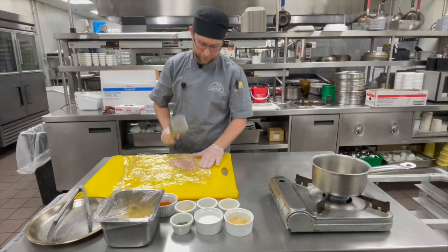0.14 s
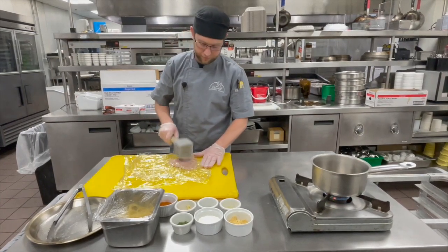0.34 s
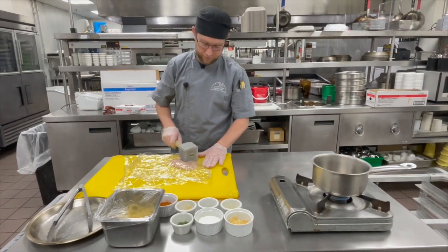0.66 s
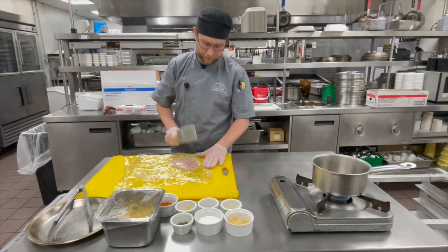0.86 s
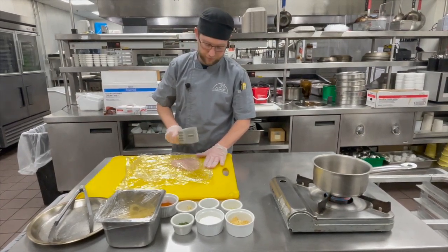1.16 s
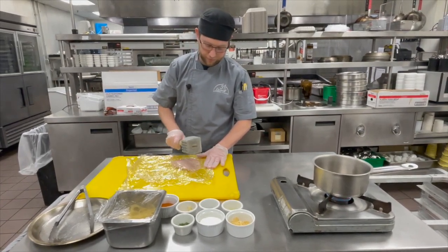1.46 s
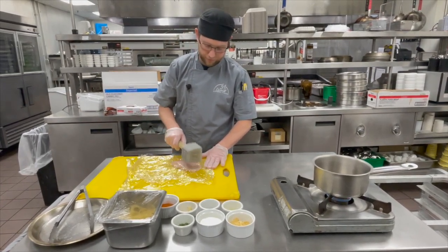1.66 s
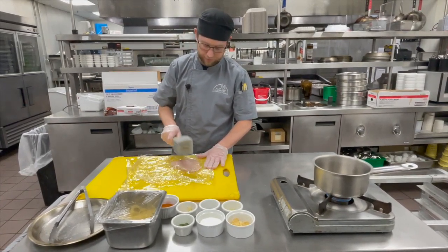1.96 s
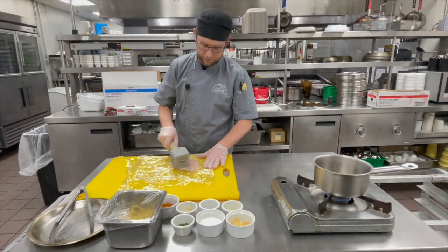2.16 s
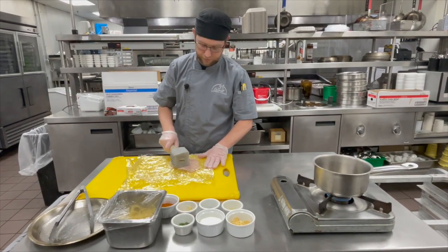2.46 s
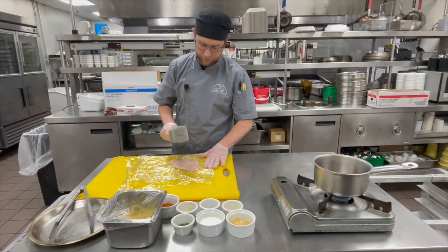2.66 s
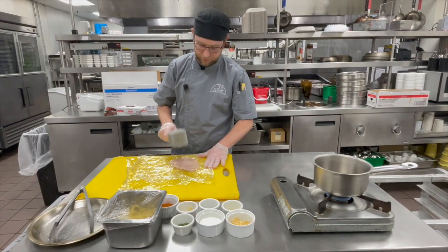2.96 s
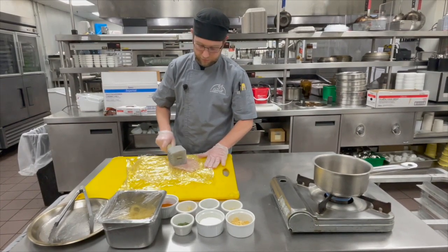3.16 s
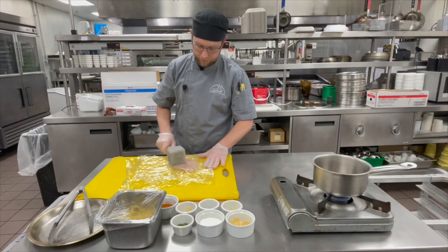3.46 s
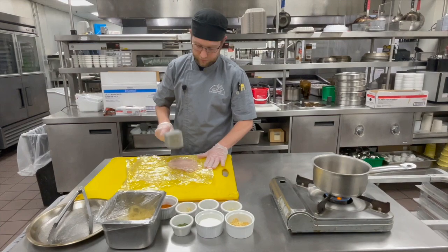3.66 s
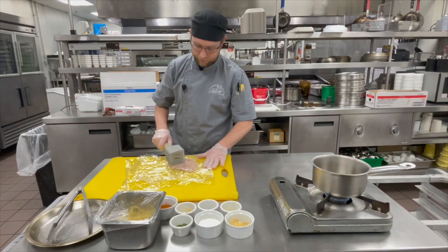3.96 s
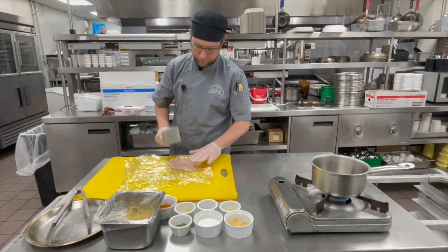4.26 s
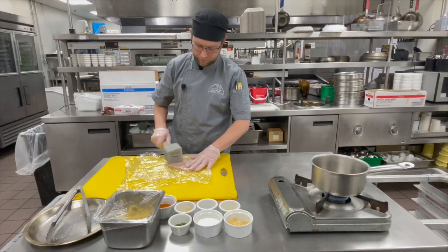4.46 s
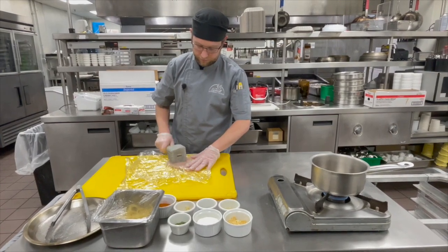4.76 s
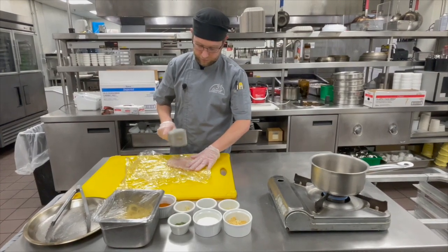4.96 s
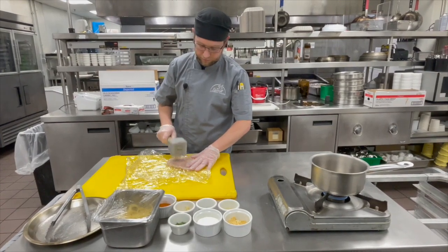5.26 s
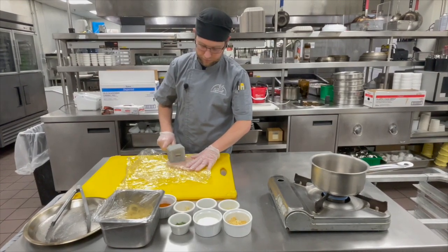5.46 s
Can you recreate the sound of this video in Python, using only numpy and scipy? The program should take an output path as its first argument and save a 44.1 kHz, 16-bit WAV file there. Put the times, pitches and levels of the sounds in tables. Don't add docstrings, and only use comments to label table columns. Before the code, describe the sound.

Sixteen blows of a meat mallet land in a steady, slightly uneven rhythm. The steel table jolts, and loose pans, trays and bowls hop and rattle after every hit. Midway some hits are softer and film rustles faintly under a hand; later there is a longer gap with another rustle, then strong pounding resumes. Close, loud and a little distorted, in a reverberant tiled kitchen with quiet fan noise.

```python
import sys
import numpy as np
from scipy import signal
from scipy.fft import rfft, irfft, next_fast_len
from scipy.io import wavfile
from scipy.ndimage import uniform_filter1d, map_coordinates

SR = 44100
rng = np.random.default_rng(int(sys.argv[2]) if len(sys.argv) > 2 else 0)


def linear_from_db(decibels):
    return 10 ** (np.asarray(decibels, float) / 20)


def transcribe(u):
    v = np.clip(np.atleast_2d(u).T, -1, 1)
    q = np.round(v * 32767).astype(np.int16)
    wavfile.write(sys.argv[1], SR, q)


N = 247840
CLOCK = np.arange(N) / SR

# [t/s, film slap peak level/dB, board knock level/dB, table thump level/dB, under-shelf ring level/dB]
MALLET_BLOWS = [(0.1172, 3, 0, -8, -17.5), (0.4893, -12, -10, -9.5, -11), (0.835, 0, -7.5, -14.5, -16),
                (1.1697, 0.5, -4, -13, -33), (1.445, -5, -4.5, -14, -30), (1.705, -15, -28, -17.5, -27),
                (1.9972, -9.5, -20, -14, -41), (2.3395, -3.5, -2, -8, -34), (2.6839, -1.5, -7.5, -8.5, -25),
                (3.023, 0, -8, -7.5, -19.5), (3.3767, -3, -6.5, -8.5, -17.5), (3.7278, 0.5, -0.5, -8, -15),
                (4.2411, -6.5, 1.5, -9, -17), (4.638, 4, -6.5, -10.5, -16.5), (5.004, -0.5, -8, -10.5, -13),
                (5.331, -2.5, -6, -12, -17.5)]
# [f/Hz, level/dB, t60/s, direction]
TABLE_TOP_SWINGS = [(54.3, -9, 0.21, -0.84), (105.7, -6, 0.081, 1), (123.5, -18, 0.16, 0.57),
                    (232.5, -13, 0.089, -0.67)]
# [f/Hz, width/Hz, level/dB]
BOARD_MODES = [(543, 130, -6), (960, 430, -7), (1284, 182, 2), (1680, 1070, -10)]
# [f/Hz, level/dB]
SLAP_COLOUR = [(300, -29), (1500, -3), (4000, -2), (8000, 1), (12000, -8.5), (16000, -17), (20000, -21)]

# [second landing t/s, first landing level/dB, second landing level/dB,
# body minus treble level/dB, bowls level/dB]
WARE_HOPS = [(0.177, 3, 2, -0.5, -9), (0.5454, 2.5, 2.5, -0.5, -21), (0.894, -7.5, 1.5, -0.5, -12),
             (1.226, -12.5, -1, 1, -7), (1.5, -15.5, -6.5, 1.5, -9), (1.7553, -26, -4, 0.5, -11),
             (2.054, -13, -2.5, 1.5, -7.5), (2.3985, -1.5, 1.5, 1, -4), (2.744, 0, 3.5, -0.5, -6),
             (3.0837, 0.5, 4, 0, -2), (3.437, 0.5, 3.5, -0.5, -1), (3.789, 2, 3.5, -0.5, -10),
             (4.2984, -1, 3, 0.5, -1), (4.696, -2, 1.5, 1, -6), (5.064, 0.5, 1.5, -1, -12),
             (5.387, -5.5, -1.5, 0.5, -9)]
# [t/s, rattle level/dB, body minus treble level/dB, bowls level/dB]
LATE_REBOUNDS = [(0.209, -1.5, 0, -30), (0.252, -25, 1, -40), (0.304, -16, 1, -40), (0.586, -8.5, -6, -40),
                 (0.934, -11.5, -2, -40), (1.264, -14, 0, -40), (1.301, -16.5, -9, -14),
                 (1.555, -12.5, -17, -14), (1.812, -14.5, -4, -13.5), (2.109, -11.5, -7, -9),
                 (2.1514, -27, 4, -25), (2.428, -16, -1, -40), (2.477, -25, -7, -14), (2.799, -21, 5, -40),
                 (2.8185, -25, -9, -10), (2.846, -23, -6, -40), (3.5014, -16, -1, -12),
                 (3.8434, -24, -4, -16), (4.3724, -18, 7, -21), (4.77, -18, -14, -13),
                 (5.1394, -26, 5, -23)]
# [f/Hz, width/Hz, level/dB]
WARE_MODES = [(388, 42, -4.5), (574.4, 12.3, 6), (690, 8.3, -6), (1054, 6.9, 1), (1235, 4.3, 0.5),
              (1450, 27, -10), (1622, 38, -8.5), (1790, 11, -1), (1903, 71, -8), (2770, 61, 3),
              (3120, 14, -2.5), (3200, 46, 1.5), (4090, 30, -16), (6800, 46, -12)]
# [f/Hz, level/dB]
BODY_COLOUR = [(120, -10), (250, -10), (500, -3.5), (1000, -0.5), (1800, 0.5), (3000, -6.5), (4500, -9),
               (8000, -37)]
TREBLE_COLOUR = [(1500, -55), (3000, 2.5), (4500, -2.5), (6500, 1.5), (8500, -2), (11000, -26),
                 (16000, -52)]
TOP_COLOUR = [(6000, -32), (9500, 4.5), (11000, -1.5), (13000, -8.5), (16000, -13), (20000, -21)]
# [f/Hz, level/dB, t60/s]
BOWL_NOTES = [(5100, -11, .04), (5960, 1, 0.073), (6160, 2, 0.11), (6340, -19, 0.052), (8160, 1, 0.033),
              (8340, -1.5, 0.023), (13600, -11, 0.045)]

# [t/s, hold/s, level/dB]
FILM_STROKES = [
    (1.776, 0.29, -24),
    (4.322, 0.18, -22),
]
# [f/Hz, level/dB per Hz]
RUSTLE_COLOUR = [(290, -42), (500, -3.5), (659, -2), (1210, -3.5), (2570, -8), (3290, -12), (4030, -11),
                 (9220, -20), (16000, -46)]
# [f/Hz, hold/s, level/dB]
PAN_NOTES = [(309, 0.223, -31.5), (259, 0.091, -37)]

# [f/Hz, t60/s]
ROOM_DECAY = [(100, 0.19), (500, 0.58), (2000, 0.6), (5000, 0.52), (9000, 0.34), (12000, 0.22),
              (15000, 0.22)]
# [f/Hz, level/dB per Hz]
FAN_COLOUR = [(15, -42), (25, -1), (108, -16), (157, -10), (190, -7.5), (285, -7.5), (373, -4.5),
              (489, -12), (531, -3.5), (624, -4.5), (775, -8.5), (2220, -16), (16000, -50)]


def mallet():
    s, slap_db, knock_db, thump_db, shelf_db = np.transpose(MALLET_BLOWS)
    slap = bursts(s + 0.00064, slap_db - 4, rise=0.00042, fall=0.014)
    slap = slap + bursts(s + 0.0089, slap_db - 12.5, rise=0.0053, fall=0.019)
    push = bursts(s + 0.0017, knock_db + 16, rise=0.0042, fall=0.022)
    push = push + bursts(s + 0.01, knock_db + 10.0, rise=0.0092, fall=0.075)
    knock = filtered(push * rng.standard_normal(N), modes(BOARD_MODES))

    thump, t = np.zeros(N + SR), np.arange(SR // 2) / SR
    soft = (1 - np.exp(-t / 0.0017)) ** 2
    for k in range(len(s)):
        swing = np.zeros(len(t))
        for hz, db, t60, way in TABLE_TOP_SWINGS:
            level_db = db + rng.normal(0, 1) - 60 * t / t60
            swing += way * linear_from_db(level_db) * np.sin(2 * np.pi * hz * t)
        shelf = -linear_from_db(shelf_db[k] - 4.0 - 60 * t / 0.37) * np.sin(2 * np.pi * 194 * t)
        thump[round(s[k] * SR):][:len(t)] += linear_from_db(thump_db[k] + 11) * (swing + shelf) * soft
    return knock + slap * noise(SLAP_COLOUR, spiky_db=4), thump[:N]


def ware():
    (at, hit_db, low_db, high_db), (s, db, body_db, top_db) = contacts()
    body = bursts(s, db + body_db - 6.0, rise=0.046, fall=0.12)
    body = body + bursts(at, hit_db + low_db - 11.0, rise=0.006, fall=0.079)
    treble = bursts(s, db - 6.5, rise=0.033, fall=0.05)
    treble = treble + bursts(at, hit_db - 11.5, rise=0.0066, fall=0.088)
    top = bursts(s, db + top_db + 2.5, rise=0.016, fall=0.034)
    top = top + bursts(at, hit_db + high_db - 9.5, rise=0.0031, fall=0.045)

    grit = unit(linear_from_db(1.36 * wobble(250) + 3.24 * wobble(1500)))
    rattle = body * noise(BODY_COLOUR)
    rattle = rattle + treble * noise(TREBLE_COLOUR, spiky_db=3)
    rattle = grit * (rattle + top * noise(TOP_COLOUR, spiky_db=-9))
    return rattle + linear_from_db(6.0) * filtered(rattle, modes(WARE_MODES))


def contacts():
    lift_s, first_s = 0.0176, 0.027
    blow = np.transpose(MALLET_BLOWS)[0]
    second, first_db, second_db, body_db, _ = np.transpose(WARE_HOPS)
    late, late_db, late_body_db, _ = np.transpose(LATE_REBOUNDS)
    n, m = len(blow), len(late)

    touch_s = np.r_[blow + lift_s, blow + first_s, second]
    touch_db = np.r_[0.45 * first_db - 7.5, first_db, second_db]
    touch_body_db = np.repeat([3, -7, -2.5], n) + np.r_[body_db, body_db, body_db]
    touch_top_db = np.repeat([-26, -16, -19], n)

    peak_s = np.r_[blow + first_s + 0.002, blow + 0.0697, late]
    peak_db = np.r_[first_db - 4, second_db - 6.5, late_db]
    tilt_db = np.r_[body_db, body_db, late_body_db]
    peak_body_db = np.repeat([2.5, 0.4, 0.4], [n, n, m]) + tilt_db
    peak_top_db = np.repeat([-13, -13.5, -19.5], [n, n, m]) - 0.3 * tilt_db
    return (touch_s, touch_db, touch_body_db, touch_top_db), (peak_s, peak_db, peak_body_db, peak_top_db)


def bowls():
    chink_s = 0.0675
    touches = [(blow[0] + chink_s, hop[-1]) for blow, hop in zip(MALLET_BLOWS, WARE_HOPS)]
    touches += [(row[0], row[-1]) for row in LATE_REBOUNDS]
    out, t = np.zeros(N + SR), np.arange(SR // 4) / SR
    for s, db in touches:
        ring = np.zeros(len(t))
        for hz, note_db, t60 in BOWL_NOTES:
            level_db = note_db + rng.normal(0, 1.3) - 60 * t / t60
            ring += linear_from_db(level_db) * np.sin(2 * np.pi * hz * t)
        out[round(s * SR):][:len(t)] += linear_from_db(db - 9.0) * ring
    return out[:N] * unit(1.3 + wobble(250))


def hand():
    strokes, pan = np.zeros(N), np.zeros(N)
    for s, hold, db in FILM_STROKES:
        strokes += curve(s, rise=0.11, hold=hold, fall=0.16, db=db, sag_db=4)
    for hz, hold, db in PAN_NOTES:
        note = np.sqrt(2) * np.sin(2 * np.pi * hz * CLOCK + 0.75 * wobble(30)) * linear_from_db(3.4 * wobble(45))
        pan += curve(4.36, rise=0.037, hold=hold, fall=0.071, db=db, sag_db=2.5) * note
    return strokes * noise(RUSTLE_COLOUR, spiky_db=5.5) + pan


def wash(x):
    framing = dict(nperseg=512, noverlap=384)
    hz, t, z = signal.stft(x, SR, **framing)
    keep = linear_from_db(-120 * t[1] / along(ROOM_DECAY, hz))
    energy = uniform_filter1d(np.abs(z) ** 2, size=3, axis=0)
    held = np.abs([signal.lfilter([0, 0, 0, 1 - k], [1, -k], p) for k, p in zip(keep, energy)])
    air = signal.stft(rng.standard_normal(N), SR, **framing)[2]
    air = air / np.sqrt(np.mean(np.abs(air) ** 2))
    return signal.istft(np.sqrt(held) * air, SR, **framing)[1][:N]


def kitchen(x):
    later_blows = np.transpose(MALLET_BLOWS)[0, 1:]
    edges = np.r_[0, np.round(later_blows * SR).astype(int) - SR // 100, N]
    out = np.zeros(N + 2 * SR)
    for a, b in zip(edges[:-1], edges[1:]):
        hz, t, z = signal.stft(rng.standard_normal(SR), SR, nperseg=256)
        decay = linear_from_db(-60 * t / along(ROOM_DECAY, hz)[:, None])
        tail = signal.istft(z * decay, SR, nperseg=256)[1]
        wet = signal.fftconvolve(x[a:b], tail / np.linalg.norm(tail))
        out[a + SR // 200:][:len(wet)] += wet
    return out[:N]


def earlier():
    low = linear_from_db(-22.5 - 104 * CLOCK) * noise(BODY_COLOUR)
    return low + linear_from_db(-34 - 120 * CLOCK) * noise(TREBLE_COLOUR)


def fans():
    return linear_from_db(-30.5) * noise(FAN_COLOUR)


def unit(x):
    return x / np.sqrt(np.mean(x ** 2) + 1e-20)


def along(points, hz):
    f, v = np.transpose(points)
    return np.interp(np.log(hz + 1), np.log(f + 1), v)


def curve(start, rise, hold, fall, db, sag_db):
    s = np.cumsum([start, rise, hold, fall])
    return linear_from_db(np.interp(CLOCK, s, [db - 32, db, db - sag_db, db - sag_db - 18], -120, -120))


def filtered(x, response):
    m = next_fast_len(N + SR // 2)
    return irfft(rfft(x, m) * response(np.fft.rfftfreq(m, 1 / SR)), m)[..., :N]


def modes(rows):
    def response(f):
        total = 0
        for k, (centre, width, db) in enumerate(rows):
            damping = 1j * f * width
            total = total + (-1) ** k * linear_from_db(db) * damping / (centre * centre - f * f + damping)
        return total
    return response


def noise(spectrum, spiky_db=0):
    clicks = rng.standard_normal(N) * linear_from_db(spiky_db * rng.standard_normal(N))
    return unit(filtered(clicks, lambda hz: linear_from_db(along(spectrum, hz))))


def bursts(times, dbs, rise, fall):
    u = np.arange(-SR // 10, SR // 5) / SR
    shape = linear_from_db(np.where(u < 0, 60 * u / rise, -60 * u / fall))
    marks = np.bincount(np.round(times * SR).astype(int), linear_from_db(dbs), N)
    return np.abs(signal.fftconvolve(marks, shape)[SR // 10:][:N])


def wobble(rate):
    knots = rng.standard_normal(int(N * rate / SR) + 4)
    return map_coordinates(knots, [np.arange(N) * rate / SR])


def scene():
    blows, thump = mallet()
    clatter, china = ware(), bowls()
    room = kitchen(linear_from_db(-16.0) * blows + linear_from_db(-5.5) * thump + linear_from_db(-13) * clatter)
    room = room + linear_from_db(-3.5) * wash(clatter + linear_from_db(-4) * china)
    near = blows + thump + clatter + china + hand()
    return (near + room + earlier() + fans())[None]


def roll_off(x):
    return signal.sosfilt(signal.butter(12, 16330, fs=SR, output="sos"), x)


def record(dry):
    clipped = dry / (1 + np.abs(dry / 0.99) ** 12) ** (1 / 12)
    mix = filtered(clipped, lambda hz: linear_from_db(-np.clip((hz - 15740) / 3, 0, 50)))
    return roll_off(mix)


dry = scene()
out = record(dry)
transcribe(out)
```